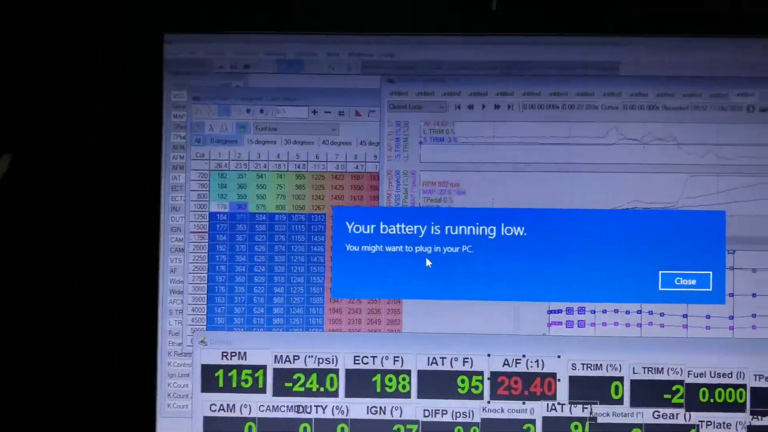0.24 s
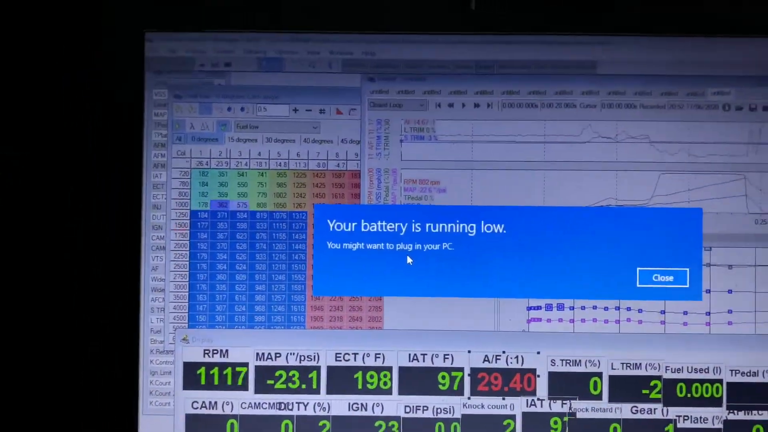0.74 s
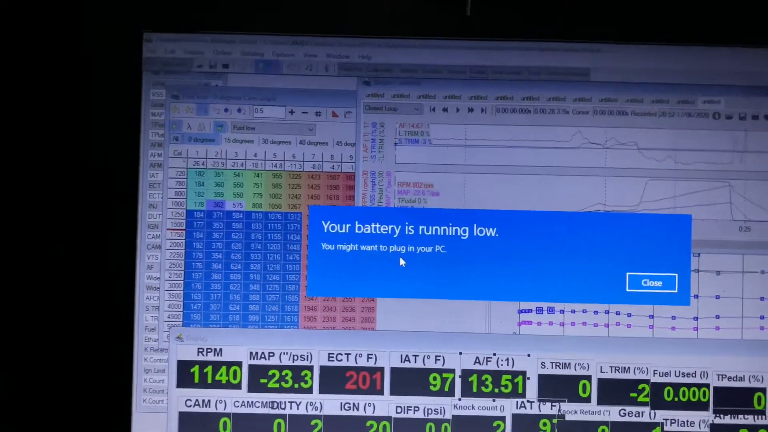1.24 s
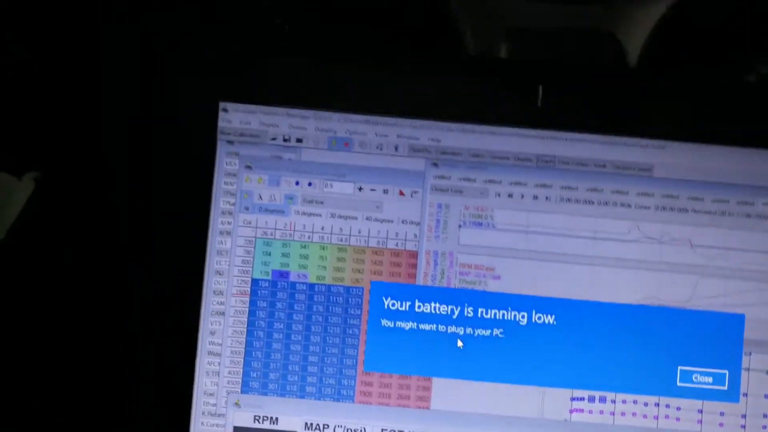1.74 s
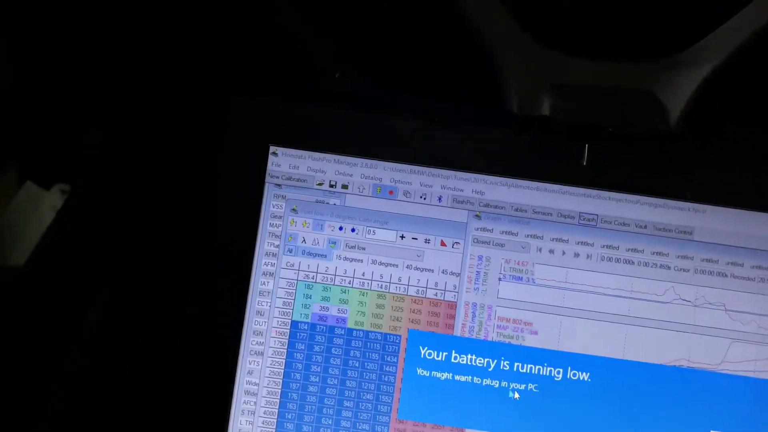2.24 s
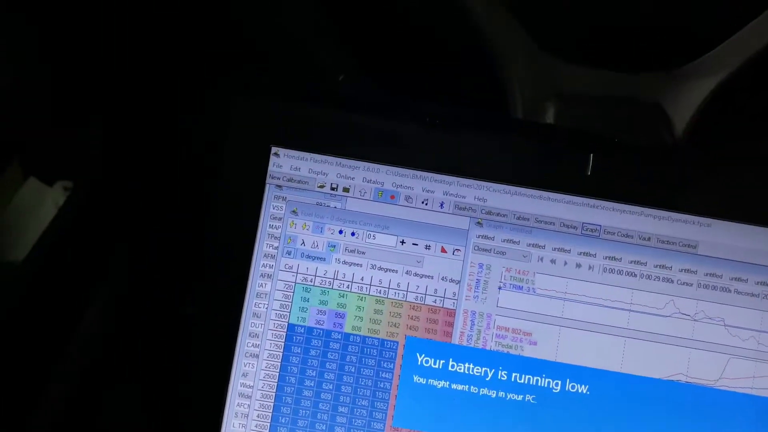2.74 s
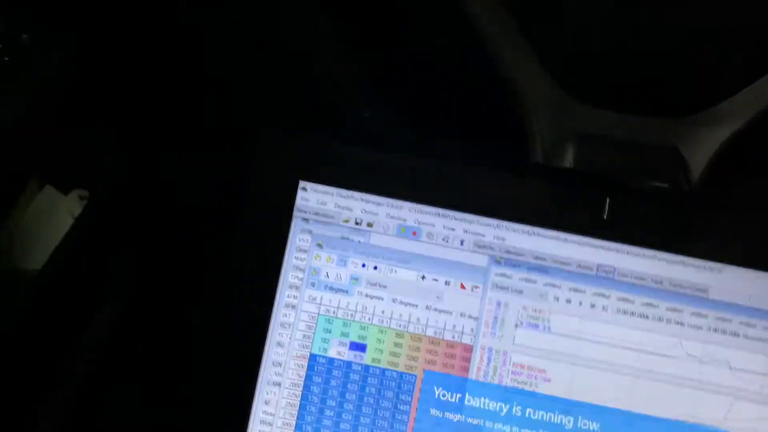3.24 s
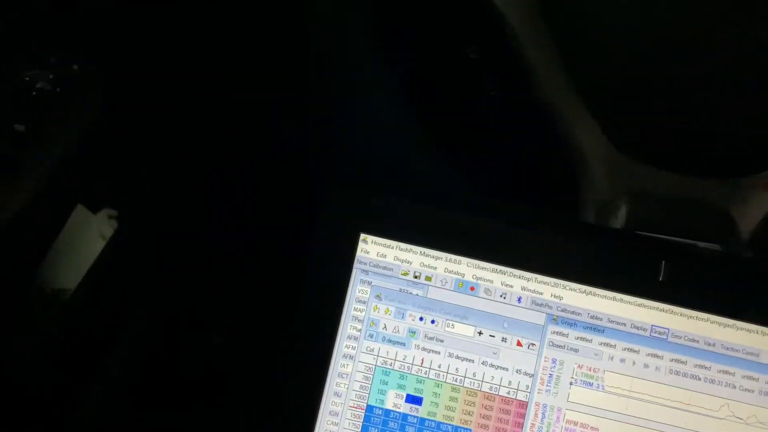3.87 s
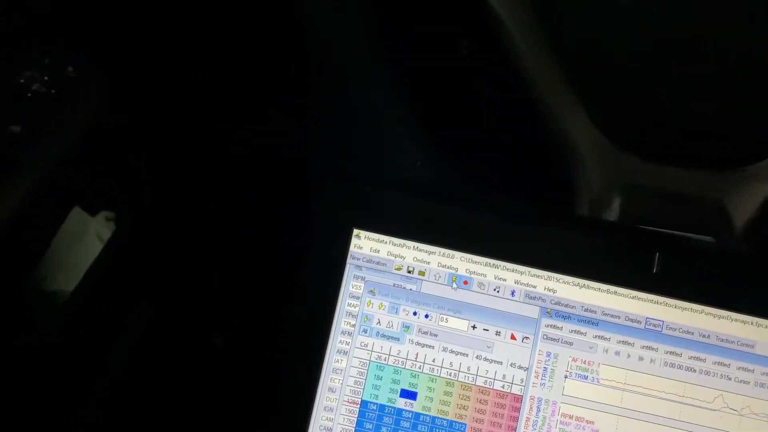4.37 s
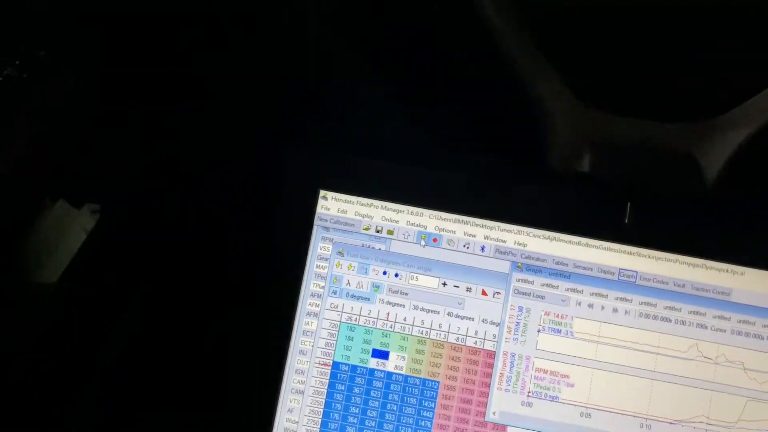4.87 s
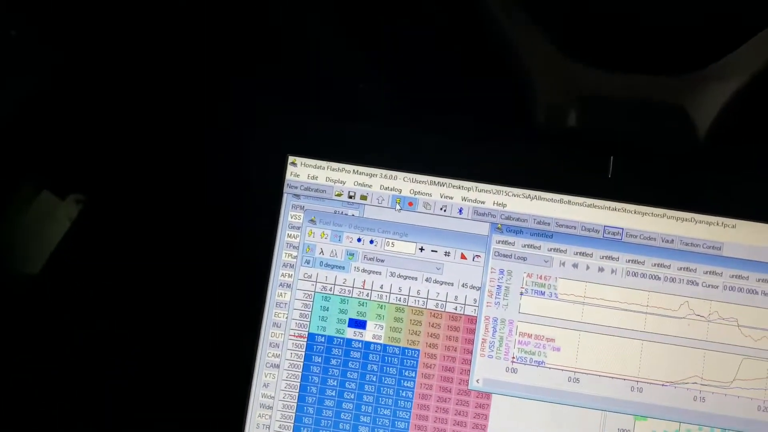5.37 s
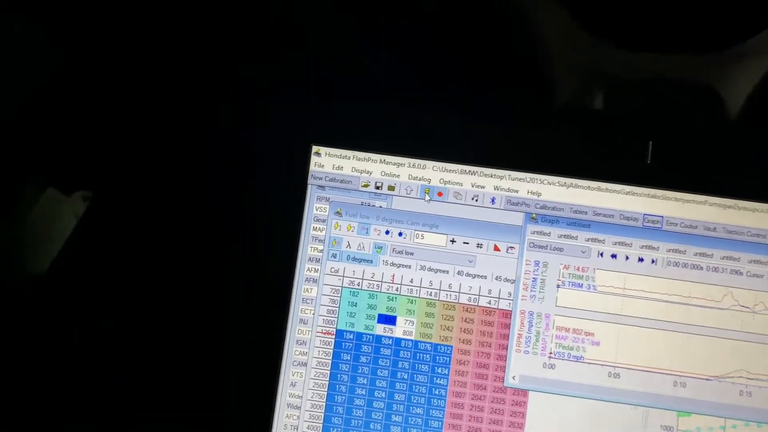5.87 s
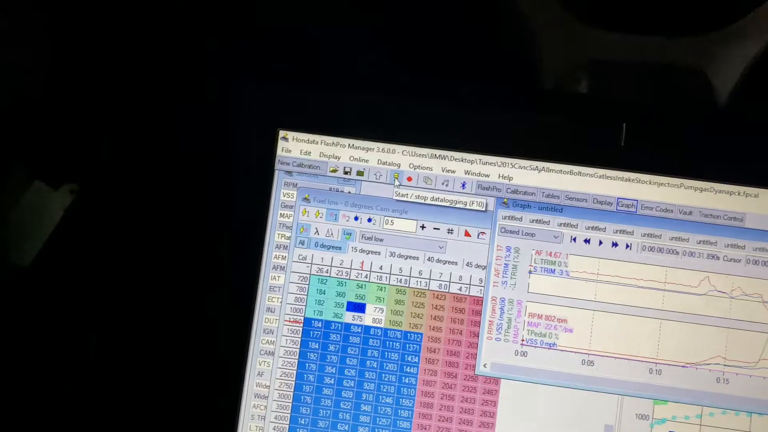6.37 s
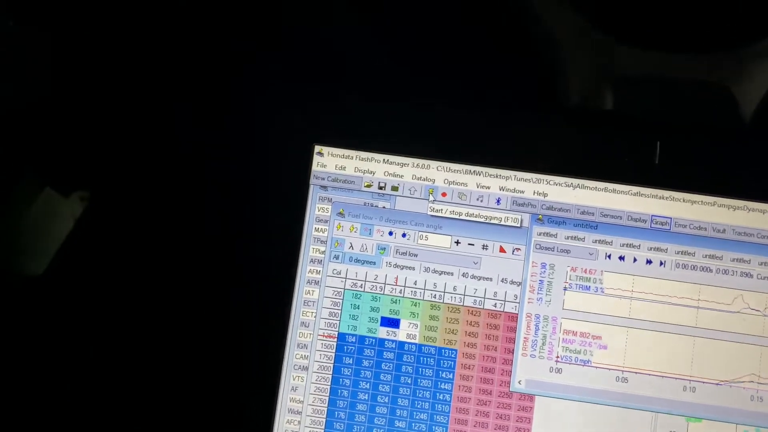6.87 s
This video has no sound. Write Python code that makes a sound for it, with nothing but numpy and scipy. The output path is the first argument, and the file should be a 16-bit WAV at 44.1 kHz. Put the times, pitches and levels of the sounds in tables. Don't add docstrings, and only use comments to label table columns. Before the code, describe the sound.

Inside a parked car, a four-cylinder engine settles from a rev blip to a low booming idle, laptop keys clack, then the engine shudders.

```python
import sys
import numpy as np
from scipy import signal
from scipy.fft import rfft, irfft
from scipy.io import wavfile
from scipy.ndimage import uniform_filter1d

SR = 44100
rng = np.random.default_rng(int(sys.argv[2]) if len(sys.argv) > 2 else 0)


def wav_record(signal):
    frames = np.transpose(np.atleast_2d(signal))
    bounded = np.clip(frames, -1, 1)
    quanta = np.round(bounded * 32767).astype(np.int16)
    wavfile.write(sys.argv[1], SR, quanta)


def level_to_linear(level):
    exponent = np.asarray(level, float) / 20
    return 10 ** exponent


N = 313595
IDLE_HZ = 27.73

# (frequency [Hz], left minus right [dB])
TILT = [(30, -3), (60, -2), (86, 6.5), (120, -1.5), (180, 7.5), (250, 0), (510, -1.5), (730, 2.5),
        (1200, 6.5), (2130, 4), (4000, 3), (8000, 1.5)]
# (frequency [Hz], left lead [rad])
LEAD = [(45, 0.065), (62, 0.21), (110, 0.61), (140, 0.28), (220, 1.27), (400, 1.45)]
# (time [s], level [dB])
HISS = [
    (0.0, -59.5),
    (0.32, -61.5),
    (2.81, -60.5),
    (3.46, -58),
    (6.54, -53),
    (7.11, -55),
]


def evened(x):
    return x / np.sqrt(np.mean(x ** 2) + 1e-20)


def read(points, hz):
    f, value = np.transpose(points)
    return np.interp(np.log(hz + 1), np.log(f + 1), value)


def follow(rows):
    s, *columns = np.transpose(rows)
    return [uniform_filter1d(np.interp(np.arange(N) / SR, s, c), size=900) for c in columns]


def wander(hz):
    knots = int(N / SR * hz) + 2
    smooth = signal.resample(rng.standard_normal(knots), 16 * knots)
    return np.interp(np.linspace(0, len(smooth) - 1, N), np.arange(len(smooth)), evened(smooth))


def bell(x, centre, width):
    return np.exp(-((x - centre) / width) ** 2)


def resonate(x, hz, width_hz):
    ring = signal.iirpeak(np.clip(hz, 20, SR / 2.2), hz / width_hz, SR)
    return signal.lfilter(*ring, signal.lfilter(*ring, x))


def tone(phase, hz, db):
    side = np.array([[.5], [-.5]])
    level = np.sqrt(2) * level_to_linear(db + side * read(TILT, hz))
    return level * np.cos(phase + side * read(LEAD, hz))


def cabin(hz):
    # (centre [Hz], width [Hz], gain [dB])
    booms = [(26.4, 1.8, -15), (32, 2.2, 5), (64.67, 4.8, 8.5), (77.5, 3.4, 5.5), (94.6, 8.7, -16.5),
             (115.8, 2.8, 3.5), (132.3, 10.9, 11), (149.4, 2.4, -6), (159.9, 6.7, 12), (184, 6.5, 7.5),
             (217.6, 6, 13), (231.7, 6.4, -18), (278, 15, 11.5)]
    return sum(db * bell(hz, f, width) for f, width, db in booms)


def controls():
    # (time [s], firing rate [Hz])
    speed = [(0, 39.12), (.07, 38.99), (.14, 36), (.24, 34.64), (.45, 37.13), (.66, 38.2), (.96, 37.88),
             (1.3, 36.43), (1.64, 34.34), (2.15, 30.81), (2.83, 28.13), (3.34, 27.43), (3.95, 27.72),
             (4.4, 27.07), (4.95, 27.37), (5.3, 27.03), (7.11, 27.4)]
    # (time [s], speed change [Hz], load [0-1], roughness [0-1])
    shudder = [
        (6.565, 0.5, 0, 0),
        (6.6, -0.5, 0.71, .1),
        (6.65, -1.2, 0.85, 0.03),
        (6.75, -3.6, 0.8, 0.3),
        (6.8, -3, 0.42, 0.66),
        (6.85, 0.14, 0.72, 0.9),
        (6.93, 0, 0.68, 0.9),
        (7.0, 1.1, 0.28, 1.1),
        (7.11, 0.2, 0.49, 0.96),
    ]
    blip_lead_s, blip_rise_s, quiet_db = 0.032, 0.12, -60.5
    drag_hz, load, rough = follow(shudder)
    u = (np.arange(N) / SR + blip_lead_s) / blip_rise_s
    blip = u * np.exp(1 - u)
    gain_db = follow(HISS)[0] - quiet_db
    return follow(speed)[0] + drag_hz, blip, load, rough, gain_db


def hiss():
    # (frequency [Hz], level [dB per Hz])
    fan_colour = [(200, -3), (260, -15), (400, -9.5), (510, -9.5), (630, -14.5), (790, -14), (1000, -11),
                  (1200, -14), (2100, -16.5), (2600, -22.5), (3650, -24.5), (4000, -29.5), (5400, -36.5),
                  (7000, -40)]
    # (frequency [Hz], level [dB per Hz])
    air_colour = [(3500, -34.5), (5000, -33.5), (5500, -36.5), (6600, -33.5), (7400, -38.5), (8600, -43.5),
                  (10200, -43), (11700, -44), (12700, -50.5), (13500, -68), (14200, -51), (15500, -50),
                  (15800, -65)]
    # (frequency [Hz], likeness [-1 to 1])
    likeness = [(200, 1), (340, 0.84), (520, 0.69), (690, 0.54), (1000, 0.65), (1550, 0.25), (1900, 0.41),
                (2400, 0.41), (4000, 0.19), (8000, -0.03), (12000, 0.95)]
    # (frequency [Hz], left lead [rad])
    port_lead = [(170, -1.5), (340, 1.1262), (520, 1.14), (690, 4), (860, 1.5), (1030, 1.5), (1200, 2.5),
                 (1900, 3), (2600, -0.5), (4300, -4), (12000, 2)]
    frames, hz = N // 256 + 5, np.fft.rfftfreq(1024, 1 / SR)
    a, b, c, d, patches = rng.standard_normal((frames, 513, 5)).T
    patches = evened(uniform_filter1d(uniform_filter1d(patches, 16, 0), 10, 1))
    flicker = evened(uniform_filter1d(rng.standard_normal(frames), 4))
    level_db = np.interp(np.arange(frames) * 256 / SR, *np.transpose(HISS))
    fan_db = (read(fan_colour, hz) - 40 * (hz < 190) - 60 * (hz > 7500))[:, None] + level_db
    air_db = (read(air_colour, hz) - 60 * (hz < 3400))[:, None] - 60 + 0.66 * (level_db + 60.5)
    same = np.clip(read(likeness, hz), -1, 1)[:, None]
    left = a + 1j * b
    shared = same * left * np.exp(-1j * read(port_lead, hz))[:, None]
    z = np.array([left, shared + np.sqrt(1 - same ** 2) * (c + 1j * d)])
    z *= level_to_linear(np.array([.5, -.5])[:, None, None] * read(TILT, hz)[:, None])
    z *= np.hypot(level_to_linear(fan_db), level_to_linear(air_db)) * level_to_linear(1.0 * patches + 0.11 * flicker)
    x = signal.istft(z, nperseg=1024, noverlap=768)[1][:, :N]
    return level_to_linear(-54.5) * evened(x)


def whine():
    on_s, rise_s, pump_hz, lag_hz, pump_db = 2.4, 0.8992, 499.7, 10, -68
    falter_s, falter_width_s, falter_db, load_db = 4.58, 0.059, -18, -13
    _, _, load, _, gain_db = controls()
    t = np.arange(N) / SR
    running = np.clip((t - on_s) / rise_s, 0, 1)
    hz = pump_hz - lag_hz * (1 - running)
    db = pump_db + gain_db + falter_db * bell(t, falter_s, falter_width_s) + load_db * load
    phase = 2 * np.pi * np.cumsum(hz + 1.53 * wander(9.3)) / SR
    return running * tone(phase, hz, db + 2.0 * wander(7.1))


def handling():
    # (time [s], peak [dB], frequency [Hz], t60 [s])
    thuds = [
        (3.93, -46, 110, .15),
        (4.49, -42, 85, .15),
        (4.74, -45, 85, .15),
        (5.02, -41, 95, .15),
        (6.19, -41, 100, .15),
        (6.592, -31, 157, .9),
        (7.069, -21, 130, .16),
    ]
    # (time [s], length [s], frequency [Hz], level [dB])
    squeaks = [
        (6.777, 0.06, 7396, -79),
        (6.79, 0.067, 5900, -80),
        (6.828, 0.06, 10100, -77),
        (6.913, 0.093, 9503, -76.5),
        (6.948, .03, 7300, -73),
        (6.992, 0.0537, 5770, -73),
        (6.621, 0.52, 1030, -61.5),
    ]
    out, t = np.zeros(N + 24000), np.arange(24000) / SR
    for s, db, hz, t60_s in thuds:
        ring = level_to_linear(db - 60 * t / t60_s) * np.sin(2 * np.pi * hz * t)
        out[round(s * SR):][:len(t)] += ring * np.minimum(t / 0.0054, 1)
    for s, length_s, hz, db in squeaks:
        rub = evened(resonate(rng.standard_normal(len(t)), hz, 350 + 0.11 * hz))
        rub *= np.sin(np.pi * np.clip(t / length_s, 0, 1))
        out[round(s * SR):][:len(t)] += level_to_linear(db) * rub
    return out[:N]


def keys():
    # (time [s], tick [dB], knock [dB], clack [dB], clack frequency [Hz])
    strokes = [(1.109, -80, -60, -59, 1500), (2.9965, -61, -56, -61, 1398), (4.4912, -54, -70, -53.5, 1680),
               (4.5974, -58, -67.5, -51.5, 1910), (5.388, -68, -53, -50.5, 1980),
               (5.3961, -58, -47, -43, 1373), (6.2235, -59, -39, -40, 1513),
               (6.2424, -69, -48, -44.5, 2280), (6.2704, -50, -54, -51, 2529),
               (6.2823, -54, -54, -49.5, 2262), (6.3146, -67, -49, -49, 1290),
               (6.3751, -59, -56, -42, 1390), (6.3812, -62.5, -55, -42, 2203), (6.399, -66, -55, -62, 2025),
               (6.5783, -51.5, -54, -46.5, 1422), (6.9163, -65, -45, -51, 1400),
               (7.0605, -69.5, -43.5, -47, 1710)]
    # (frequency [Hz], width [Hz], level [dB])
    tick_modes = [(4400, 700, 2), (6989, 1080, 3.5), (8300, 1500, -1), (10100, 3150, -2), (11750, 1700, -3),
                  (15200, 1800, -9)]
    t60_s, snap_db, snap_t60_s = 0.047, 3, .01
    out, t = np.zeros((2, N + 6000)), np.arange(6000) / SR
    for s, tick_db, knock_db, clack_db, clack_hz in strokes:
        burst = rng.standard_normal((2, len(t)))
        fade = level_to_linear(-60 * t / t60_s) * np.minimum(t / 0.0016, 1)
        bands = [level_to_linear(db) * resonate(burst[0], f, w) for f, w, db in tick_modes]
        tick = evened(sum((-1) ** k * band for k, band in enumerate(bands)))
        snap = evened(resonate(burst[1], 11500, 12000))
        tick = tick + level_to_linear(snap_db - 60 * t / snap_t60_s) * snap
        tick = np.array([np.roll(tick, shift=8), tick])
        modes = np.sin(2 * np.pi * clack_hz * t) + 0.17 * np.sin(2 * np.pi * 2.5 * clack_hz * t)
        clack = 1.4 * modes * np.sqrt(fade) + 0.8 * evened(resonate(burst, 0.92 * clack_hz, 2840))
        clack = clack * level_to_linear([[1.5], [-1.5]]) * np.minimum(t / .003, 1)
        knock = sum(a * np.sin(2 * np.pi * f * t) for f, a in [(560, 1), (460, 1.27), (370, 1.06)])
        knock *= np.clip(t / 0.0058, 0, 1) ** 2
        here = out[:, round(s * SR):][:, :len(t)]
        here += (level_to_linear(tick_db - 1) * tick + level_to_linear(clack_db + 0.2) * clack) * fade
        here += level_to_linear(knock_db + 4.5) * knock * fade ** 0.82
    return out[:, :N]


def rasp(crank, blip, load):
    rasp_hz, width_hz, blip_db, load_db = 269, 260, -54.5, -52
    noise = rng.standard_normal(N) + .5 * rng.standard_normal((2, N))
    puffs = (1 + .6 * np.cos(crank)) * noise
    puffs = resonate(resonate(puffs, rasp_hz, width_hz), rasp_hz, width_hz)
    return evened(puffs) * (level_to_linear(blip_db) * blip + level_to_linear(load_db) * load)


def body_shake(turns, db):
    # (frequency [Hz], level [dB per Hz])
    shake_colour = [(15, -42), (30, -14.5), (42, -6), (59, -2.5), (91, -11), (161, -12), (184, -11.5),
                    (218, -11.5), (253, -27.5), (317, -24), (600, -43.5), (780, -75.5), (1320, -120)]
    kicks = np.diff(np.floor(2 * turns), prepend=0) * rng.standard_normal((2, N))
    kicks = evened(kicks[0] + 0.073 * kicks[1] * np.array([[1], [-1]]))
    kicks = kicks + 0.26 * rng.standard_normal((2, N))
    f = np.fft.rfftfreq(8192, 1 / SR)
    log_gain = irfft((read(shake_colour, f) - 40 * (f < 18)) * np.log(10) / 20)
    log_gain[1:4096] *= 2
    log_gain[4097:] = 0
    body = irfft(np.exp(rfft(log_gain)))
    return evened(signal.fftconvolve(kicks, body[None], axes=1)[:, :N]) * level_to_linear(db)


def firing_orders(crank, hz, base_db, scatter, slip, spread):
    first_db, slip_rad, third_loss_db = -58, .96, -15
    out = tone(crank, hz, first_db + base_db[0])
    for k, db in enumerate(base_db[1:], 2):
        phase = k * (crank + spread * k + scatter * wander(20))
        if k == 3:
            phase = phase + slip_rad * slip
            db = db + third_loss_db * slip
        out += tone(phase, k * hz, db + 0.2 * k * wander(10))
    return out


def exhaust_bite(crank, hz, bite_db, scatter, spread):
    # (frequency [Hz], gain [dB])
    muffler = [(150, 1), (170, 0), (190, -5.5), (218, -5.5), (240, -13), (268, -13), (300, -17), (330, -15),
               (400, -15), (450, -23), (600, -35)]
    cabin_share = 0.27
    out = np.zeros((2, N))
    for k in range(6, 16):
        db = bite_db + read(muffler, k * hz) + cabin_share * cabin(k * hz) + 2.4 * wander(8)
        out += tone(k * (crank + spread * k + k / 4 * scatter * wander(20)), k * hz, db)
    return out


def half_orders(crank, hz, load, gain_db):
    load_db, cabin_share = 12, 0.45
    out = np.zeros((2, N))
    for k, db in [(1.5, -63.5), (2.5, -64.5), (3.5, -70), (4.5, -66.5), (5.5, -68)]:
        db = db + gain_db + load_db * load + cabin_share * cabin(k * hz) + 4.8 * wander(5.8)
        out += tone(k * crank, k * hz, db)
    return out


def engine():
    # (rest level [dB], added by blip, by load, by roughness, by settling [dB])
    firing = [
        (-47, 3.5, 14.5, 0, -0.5),
        (-46, 2.5, -1.5, 3, 7.5),
        (-56, 6.5, 0, 6.5, -0.5),
        (-62.5, 7, -3.5, 0, 3),
    ]
    settle_s, settle_length_s = 3.25, 4.1
    spread_rad, spread_rad_per_hz, slip_hz = -1.16, .038, 34
    hz, blip, load, rough, gain_db = controls()
    settled = np.clip((np.arange(N) / SR - settle_s) / settle_length_s, 0, 1)
    turns = np.cumsum(hz * (1 + .004 * wander(12))) / SR
    crank = 2 * np.pi * turns
    scatter = .022 + .04 * blip + .1 * rough
    spread = spread_rad + spread_rad_per_hz * (hz - IDLE_HZ)
    slip = np.clip((slip_hz - hz) / (slip_hz - IDLE_HZ), 0, 1)
    base_db = [gain_db + cabin(hz)]
    for k, (db, *adds) in enumerate(firing, 2):
        base_db.append(db + gain_db + np.dot(adds, [blip, load, rough, settled]) + cabin(k * hz))
    bite_db = -61 + gain_db + 0.7 * (hz - IDLE_HZ) + 13 * blip + 10 * load
    shake_db = -60.5 + gain_db + 16 * blip + 7 * load + 6 * rough + 2.5 * settled
    out = firing_orders(crank, hz, base_db, scatter, slip, spread)
    out += exhaust_bite(crank, hz, bite_db, scatter, spread_rad)
    out += half_orders(crank, hz, load, gain_db)
    out += rasp(crank, blip, load)
    return out + body_shake(turns, shake_db)


def scene():
    return hiss() + whine() + handling() + keys() + engine()


def top_cut(x):
    return signal.sosfilt(signal.butter(12, 15750, fs=SR, output="sos"), x)


def record(dry):
    bass_cut = signal.butter(2, 24, "high", fs=SR, output="sos")
    heard = signal.sosfilt(bass_cut, dry * np.minimum(np.arange(N) / 200, 1))
    return top_cut(heard)


dry = scene()
out = record(dry)
wav_record(out)
```